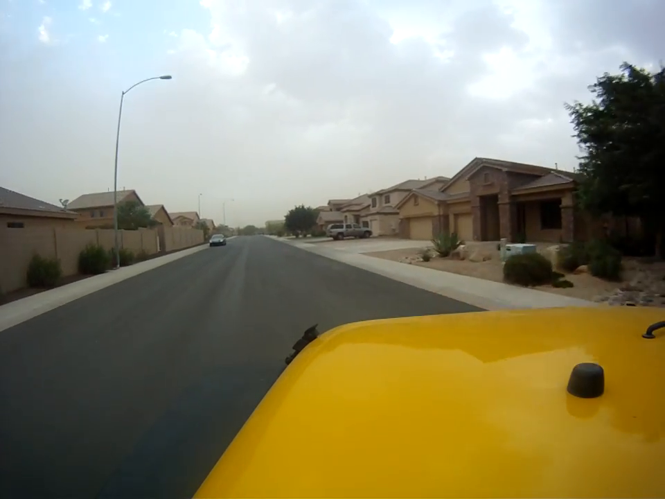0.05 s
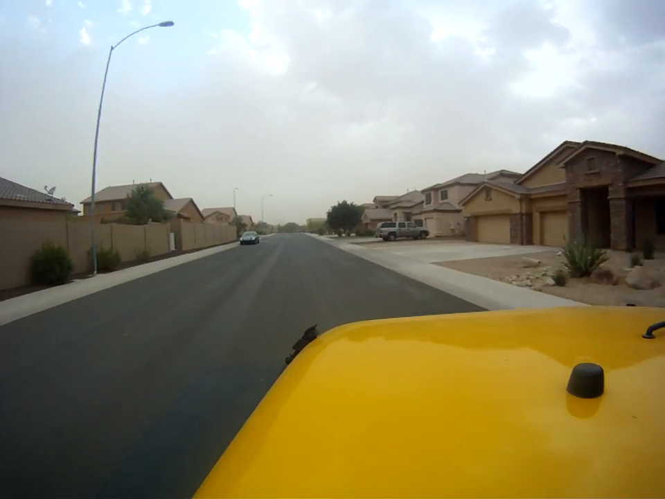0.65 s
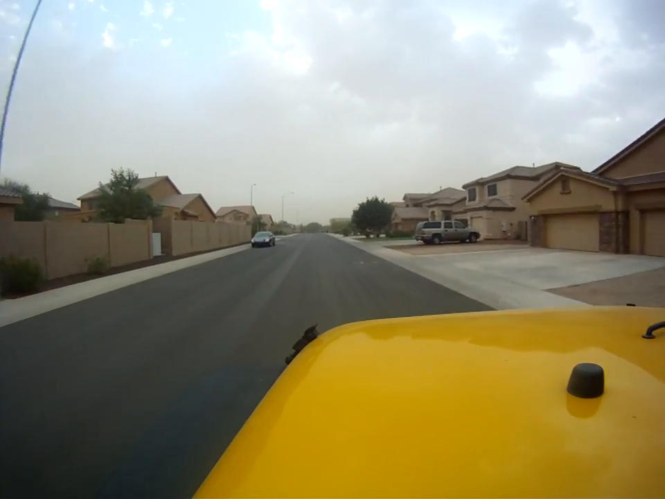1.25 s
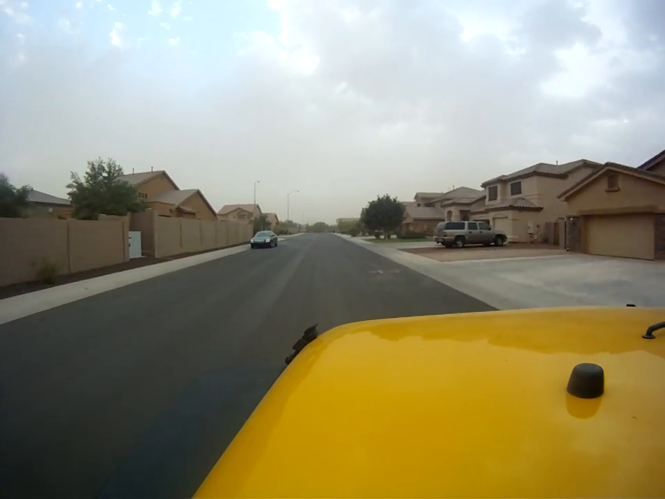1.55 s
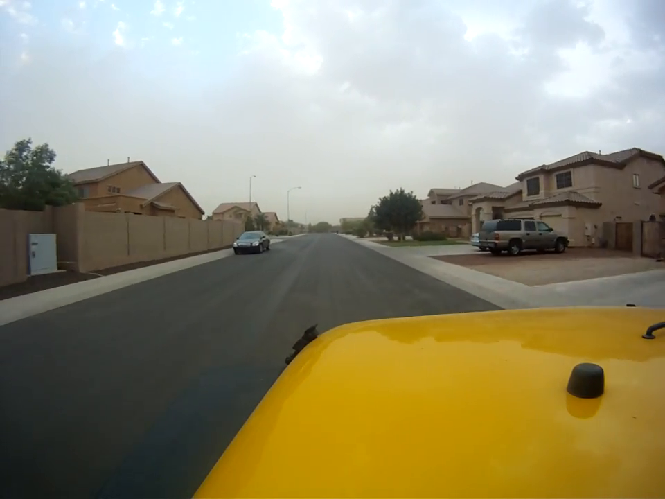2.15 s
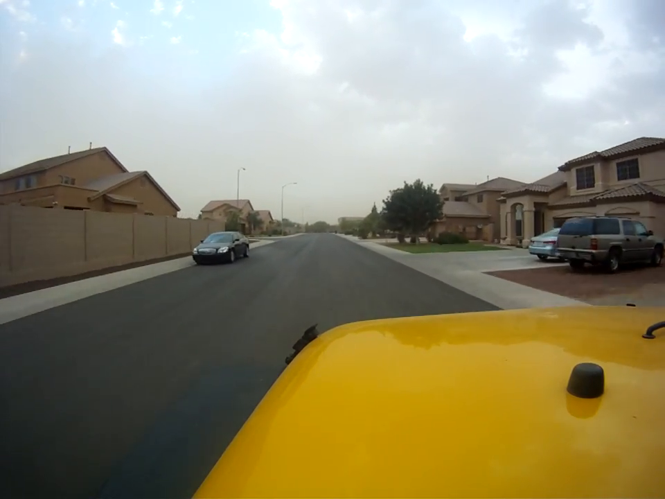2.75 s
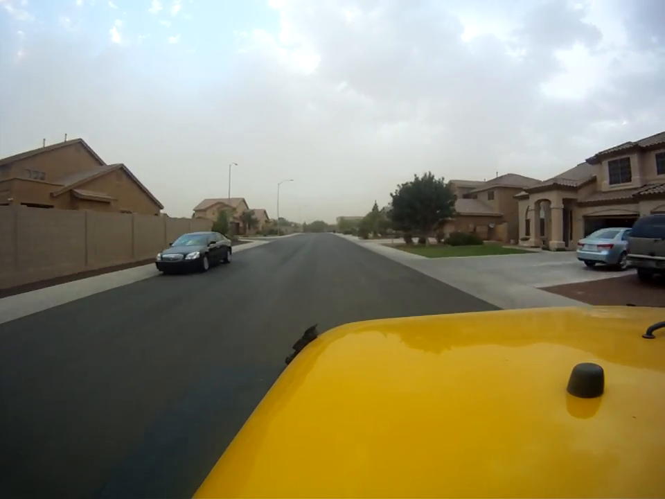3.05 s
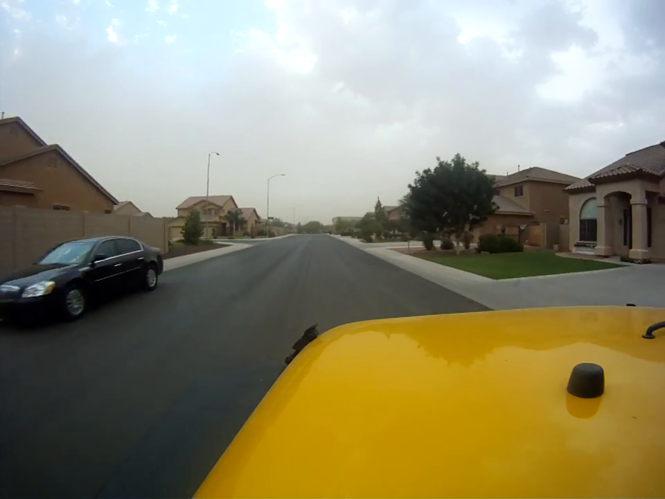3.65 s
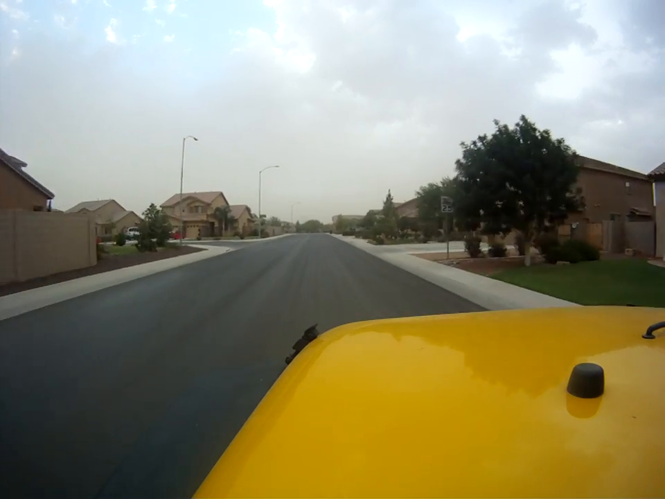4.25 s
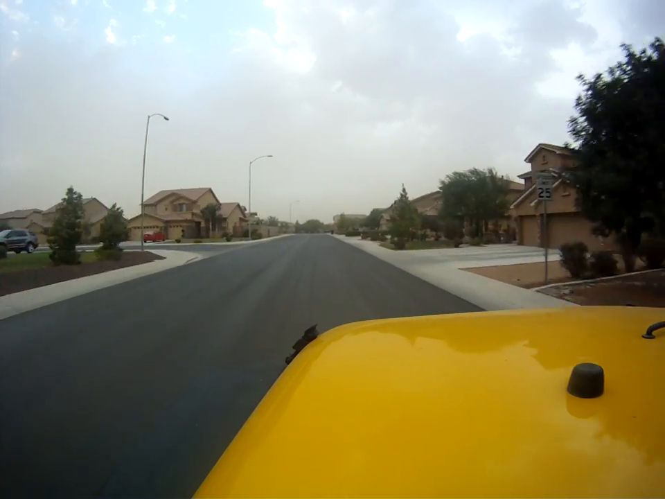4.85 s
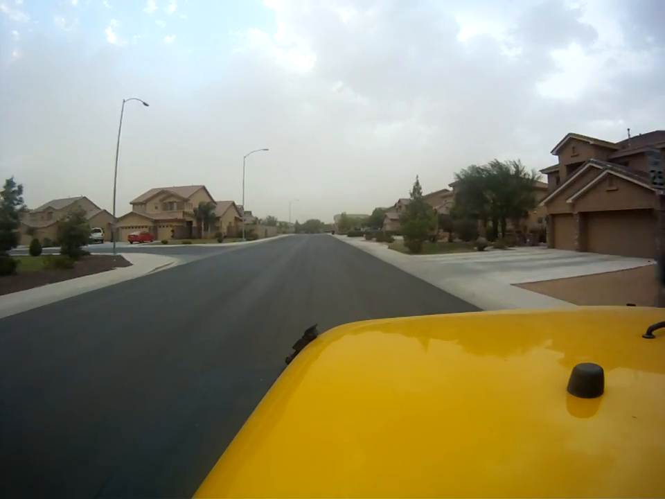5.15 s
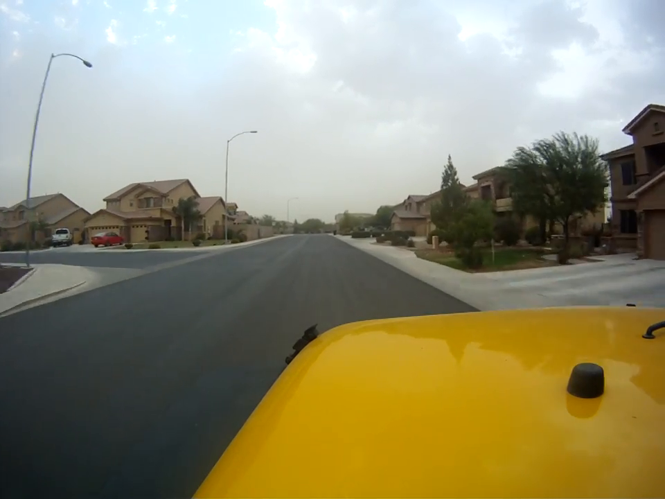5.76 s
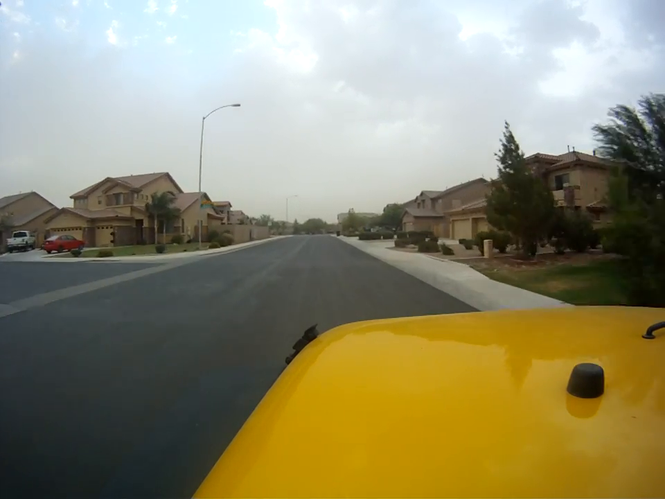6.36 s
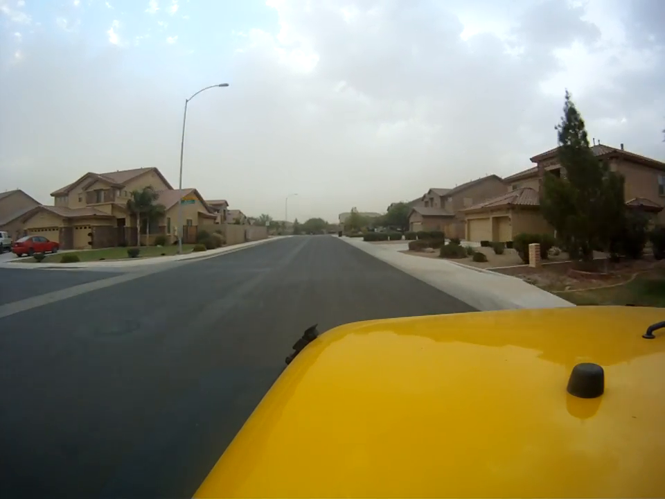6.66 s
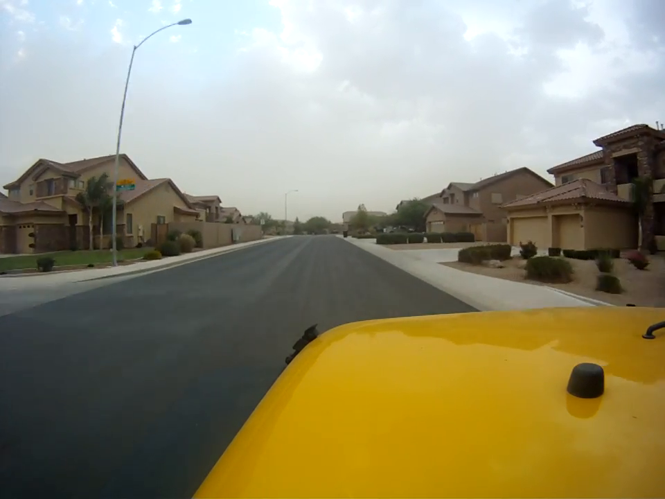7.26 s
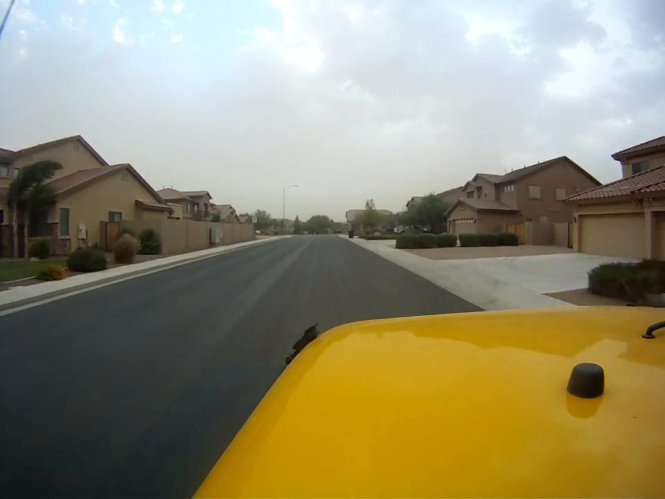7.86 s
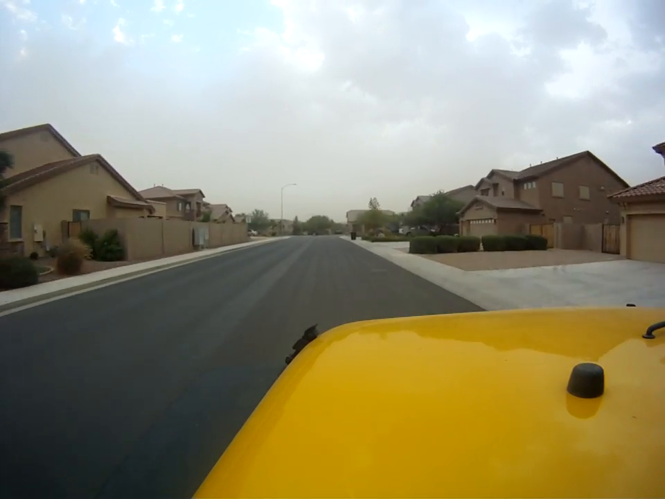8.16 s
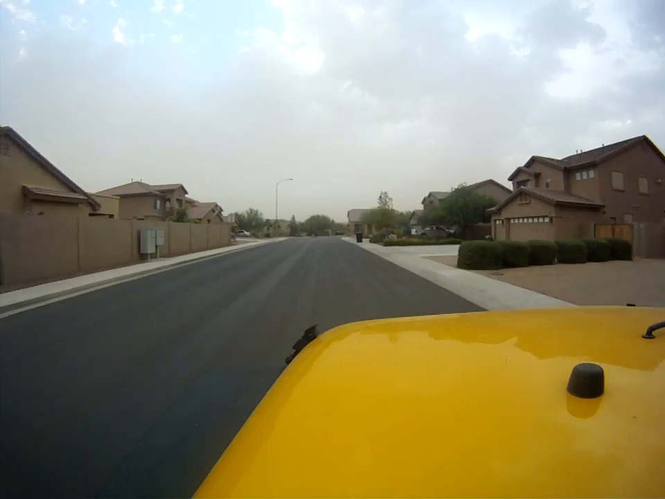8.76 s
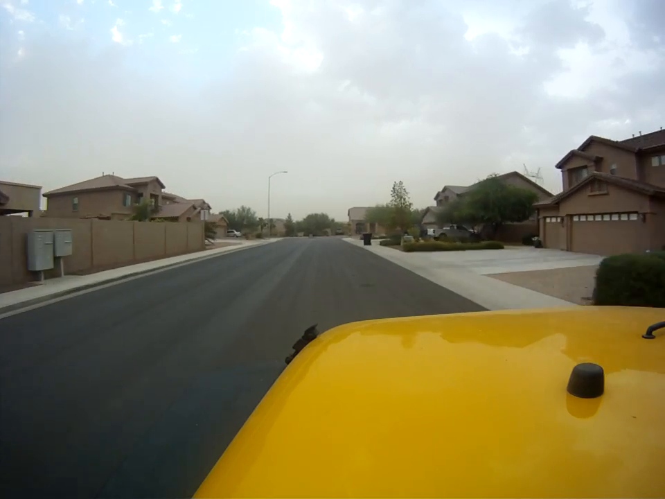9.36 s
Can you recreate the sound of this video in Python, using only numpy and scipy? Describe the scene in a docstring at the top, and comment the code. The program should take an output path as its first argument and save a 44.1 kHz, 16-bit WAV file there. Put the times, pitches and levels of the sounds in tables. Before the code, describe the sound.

Deep wind rumble and steady tyre roar surround a microphone on the hood of a moving car. The engine hums under load, eases off, then settles lower as a drone swells and its rushing noise fades. Brief hissing gusts, soft thumps and light ticks of grit dot the drive down a quiet street, all with a slightly gritty treble edge.

```python
"""A quiet street, heard from a cased camera on the hood of a moving off-road car.
The six-cylinder engine pulls, then drops in two steps to a cruising hum; its rush fades with load.
Tyres roar on the asphalt and their tread hums beat. Hood and case colour rush and roar.
Wind and jolts shake the hood into a deep rumble, gusts hiss over the case, grit ticks.
The camera's sample-and-hold adds a gritty treble sheen."""
import sys
import numpy as np
from scipy import signal
from scipy.fft import rfft, irfft
from scipy.io import wavfile
from scipy.ndimage import uniform_filter1d

SR = 44100
rng = np.random.default_rng(int(sys.argv[2]) if len(sys.argv) > 2 else 0)


def master_out(mix):
    """Clip the mix to full scale and print it as 16-bit PCM to the path in sys.argv[1]."""
    frames = np.transpose(np.atleast_2d(mix))
    ceiling = np.clip(frames, -1, 1)
    pcm = np.round(ceiling * 32767).astype(np.int16)
    wavfile.write(sys.argv[1], SR, pcm)


N = 424238
TIME_S, FREQS_HZ = np.arange(N) / SR, np.arange(N // 2 + 1) * SR / N

# four-stroke cycle rate: t/s, f/Hz
CYCLE_RATE = [(0, 16.4), (.8, 16.7), (1.4, 16.75), (1.8, 16.4), (2.3, 15.1), (4, 15.3), (4.7, 15.4),
              (5.2, 13.7), (5.5, 13.12), (8.1, 13.28), (9.62, 13.1)]
# cycle rate at cruising, easing, pulling: f/Hz
STATE_HZ = [13.2, 15.2, 16.6]
# firing note in those states: level/dB
FIRING_DB = [-57, -43.5, -40.5]
# engine overtones: multiple of cycle rate, level/dB at cruising, easing, pulling
OVERTONES = [(12, -62, -47.5, -51), (13, -50, -54, -76), (18, -62.5, -54, -59.5), (25, -55, -60, -57.5),
             (30, -51.5, -64, -63), (33.02, -61, -62, -53), (36.96, -57.5, -50, -81),
             (40.76, -75, -62, -48), (42, -55, -61, -51.5), (47.54, -54, -51, -97),
             (60.86, -61.5, -60, -57), (61.7, -74, -76, -50.5)]
# low drone near 200 Hz, engine and tyre hum swelling and dipping together: t/s, level/dB
DRONE_LEVEL = [(0, -55), (1.6, -55.5), (2.3, -50), (4.5, -47.5), (5.05, -54), (5.4, -41.5), (6.5, -41.5),
               (6.9, -57), (7.3, -42.5), (7.8, -40), (8.1, -43.5), (9.62, -45.5)]
# engine rush, following load: t/s, relative level/dB
RUSH_LEVEL = [(0, -40), (1.6, -40), (2, -41), (3.2, -42), (4.85, -42.6), (5.6, -46.5), (7, -48),
              (8.68, -48.5), (8.92, -57.5), (9.62, -59)]
# engine rush spectrum: f/Hz, relative level/dB
RUSH_SPECTRUM = [(60, -3.5), (130, -4.5), (250, -2), (500, -17), (1000, -6), (2000, -12), (3000, -23),
                 (4500, -37), (6000, -45)]
# wheel rotation: t/s, f/Hz
WHEEL_RATE = [(0, 5.2), (2, 5.5), (3, 5.72), (4.5, 5.98), (5.3, 6.11), (6.5, 6.18), (8, 6.22), (9.62, 6.14)]
# asphalt roar spectrum: f/Hz, relative level/dB
ROAR_SPECTRUM = [(58, 2.5), (75, -6), (120, -12.5), (200, -3), (300, -9.5), (550, -10.5), (800, -10.5),
                 (1200, -17), (2000, -30), (4000, -49), (6000, -53.5)]
# beat of left and right tyre: t/s, f/Hz
TYRE_BEAT = [(0, 1.82), (1.35, 1.82), (2, 1.3), (4.45, .29), (9.62, .3)]
# side tones of the uneven tread: multiple of wheel rate, level/dB at cruise
TREAD_TONES = [(27, -50), (28, -49), (32, -50.5), (53, -54.5), (66, -55.5), (80, -59), (90, -56.5)]
# low hood panel modes: f/Hz, half-width/Hz, relative level/dB
PANEL_MODES = [(26.1, 3.1, 2), (35.7, 4.2, .5), (45.2, 4.7, -3.5)]
# wind shaking the hood: t/s, level/dB
BUFFET_LEVEL = [(0, -29), (1.8, -29), (2.3, -26), (3.7, -28.5), (4.5, -24), (5.1, -27.5), (6.8, -27.5),
                (7.7, -31), (9.62, -29.8)]
# jolts to the hood: t/s, peak level/dB
JOLTS = [(.32, -26.5), (.87, -27), (1.45, -20.5), (2.48, -20.5), (2.98, -25.5), (3.2, -24.5), (3.47, -24),
         (3.94, -25), (4.72, -22), (4.88, -24), (5.62, -20), (5.78, -22), (6.25, -29), (7.22, -25)]
# gusts over the case: t/s, length/s, level/dB
GUSTS = [(0.116, 0.31, -48.5), (1.386, 0.1, -38.5), (1.566, .04, -48), (2.093, 0.081, -44),
         (3.147, .08, -53)]
# air hiss spectrum: f/Hz, relative level/dB
AIR_SPECTRUM = [(600, -13), (1300, -1), (2500, 2.5), (4000, -11), (6000, -17)]
# grit striking the body: t/s, peak level/dB
GRIT_HITS = [(2.16, -45), (2.4304, -42), (2.5516, -51), (2.589, -50), (2.6264, -49), (3.9424, -48),
             (4.5281, -51), (4.57, -52), (4.7192, -48), (4.7576, -49), (6.8758, -53), (7.1307, -51),
             (7.2085, -53), (8.1354, -54)]
# hood and engine bay peaks and dips: f/Hz, width/Hz, gain/dB
HOOD_RESONANCES = [(100, 36, 11), (129.9, 25.2, 12.5), (160.4, 21.6, 7), (244.4, 68, -9.5), (440, 22, 5),
                   (490, 15, 6.5), (522, 26, -9.5), (565, 78, 5.5), (723, 32, 2.5), (953, 62, -4.5),
                   (1064, 125, 9), (1173, 64, 8), (1273, 552, -11.5), (1586, 13, 6)]
# camera case peaks and dips: f/Hz, width/Hz, gain/dB
CASE_RESONANCES = [(2051, 190, 7), (2060, 55, 4), (2310, 182, 8.5), (2618, 82, 7), (2820, 260, -3),
                   (3741, 450, 19.5), (4087, 110, 8), (5140, 280, 4.5)]


def engine_hum_and_drone(cycle_hz, cycles, cylinders=6, drone_order=15):
    """Firing note and overtones vary as speed moves them across bay resonances; a low drone joins."""
    firing_db = np.interp(cycle_hz, STATE_HZ, FIRING_DB)
    firing, drone = tone(cylinders, cycles), tone(drone_order, cycles)
    hum = firing * from_db(firing_db + 2 * drift(14))
    # one tone stands for engine and tyre hum swelling and dipping together
    hum += drone * from_db(in_time(DRONE_LEVEL) + drift(4.4))
    for multiple, *state_db in OVERTONES:
        order = np.round(2 * multiple) / 2  # geared to the shaft
        level_db = np.interp(cycle_hz, STATE_HZ, state_db)
        hum += tone(order, cycles) * from_db(level_db + 1.4 * drift(11))
    return hum


def engine_rush(cycles, body_db, gain_db=6.0, clatter_share=0.19, clatter_low_hz=280, cylinders=6):
    """Fan, intake and valves: per-cycle clatter plus turbulence, throbbing at the firing rate."""
    pattern = rng.standard_normal(4096)
    looped = np.interp(cycles % 1, np.linspace(0, 1, len(pattern)), pattern)
    colour = spectrum_gain(RUSH_SPECTRUM, body_db) * (FREQS_HZ > clatter_low_hz)
    clatter = unit_rms(filtered(looped, colour))
    turbulence = noise(RUSH_SPECTRUM, body_db)
    rush = np.sqrt(clatter_share) * clatter + np.sqrt(1 - clatter_share) * turbulence
    throb = 1 + 0.036 * np.sin(2 * np.pi * cylinders * cycles)
    return rush * throb * from_db(in_time(RUSH_LEVEL) + gain_db + 0.82 * drift(33))


def tyres(body_db, cruise_hz=6.2, roar_db=-35.0, roar_db_per_hz=2.0, side_db_per_hz=7.0, blocks=24):
    """Asphalt roar and hum of tread blocks meeting the road; roar and side tones grow with speed."""
    wheel_hz = in_time(WHEEL_RATE)
    excess_hz = wheel_hz - cruise_hz
    roar = noise(ROAR_SPECTRUM, body_db)
    roar *= from_db(roar_db + roar_db_per_hz * excess_hz + 0.22 * drift(14))
    revs = turns(wheel_hz, wander=0.00908)
    hum = tone(blocks, revs) * tread_gain(blocks * wheel_hz) * from_db(1.1 * drift(10))
    for multiple, db in TREAD_TONES:
        hum += tone(multiple, revs) * from_db(db + side_db_per_hz * excess_hz + 2.8 * drift(4.4))
    return roar + hum


def tread_gain(tread_hz, near_tyre_db=-55.5, far_ratio_db=-2.5, in_phase_s=0.25):
    """Two tyres turn slightly apart, so their hums beat; both boom near a hood resonance."""
    beats = np.cumsum(in_time(TYRE_BEAT)) / SR
    beats -= np.interp(in_phase_s, TIME_S, beats)
    pair = np.abs(1 + from_db(far_ratio_db) * np.exp(2j * np.pi * beats))
    boom_db = bell_db(tread_hz, centre_hz=130.3, width_hz=28.7, peak_db=17.5)
    return pair * from_db(near_tyre_db + boom_db)


def hood_rumble(levelling=0.63):
    """Wind and jolts swing the hood panel in its lowest modes."""
    swing = np.zeros(N)
    for hz, half_width_hz, db in PANEL_MODES:
        response = 1 / (1 + ((FREQS_HZ - hz) / half_width_hz) ** 2)
        swing += from_db(db) * shaped_noise(response)
    power = uniform_filter1d(swing ** 2, size=SR // 7) + 1e-9
    levelled = unit_rms(swing / power ** (levelling / 2))  # slow swells shrink, fast beats stay
    wind_power = from_db(in_time(BUFFET_LEVEL)) ** 2
    jolt_power = sum((from_db(db) * swell(t, 0, rise_s=0.026, fall_s=0.091)) ** 2 for t, db in JOLTS)
    return levelled * np.sqrt(wind_power + jolt_power)


def case_hiss(breeze_db=-66, case_share=0.49):
    """Air brushes the outside of the case: a faint breeze and a few rough gusts."""
    flutter = from_db(1.2 * drift(70))
    gusts = sum(from_db(db) * swell(t, length_s, rise_s=0.016, fall_s=0.061) for t, length_s, db in GUSTS)
    hiss = noise(AIR_SPECTRUM, case_share * response_db(CASE_RESONANCES))
    return hiss * (from_db(breeze_db) + gusts) * flutter


def grit(decay_s=0.0041, faint_per_s=24.0, faint_db=-61.5):
    """Grit strikes the body: a few clear, dry ticks among many faint ones."""
    hits = (rng.random(N) < faint_per_s / SR) * from_db(faint_db + 2 * rng.standard_normal(N))
    for t, db in GRIT_HITS:
        hits[round(t * SR)] = from_db(db)
    envelope = signal.lfilter([1], [1, -np.exp(-1 / (decay_s * SR))], hits + 1e-18)
    return envelope * noise([(2000, 2), (6000, -6), (9000, -22)])


def turns(rate_hz, wander):
    """Running turn count of a shaft whose speed wanders slightly."""
    return np.cumsum(rate_hz * (1 + wander * drift(6))) / SR


def tone(order, revs):
    """Unit-RMS sine locked to a shaft, random phase."""
    return np.sqrt(2) * np.sin(2 * np.pi * (order * revs + rng.random()))


def swell(start_s, hold_s, rise_s, fall_s):
    """Exponential rise to 1 at start_s, hold, exponential fall."""
    before = np.maximum(start_s - TIME_S, 0) / rise_s
    after = np.maximum(TIME_S - start_s - hold_s, 0) / fall_s
    return np.exp(-np.minimum(before + after, 40))


def bell_db(hz, centre_hz, width_hz, peak_db):
    """One bell-shaped peak or dip."""
    return peak_db * 0.5 ** ((2 * (hz - centre_hz) / width_hz) ** 2)


def response_db(resonances):
    """Summed peaks and dips of a body."""
    return sum(bell_db(FREQS_HZ, *row) for row in resonances)


def spectrum_gain(spectrum, body_db):
    """Gain per bin: spectrum interpolated over log f, coloured by a body."""
    hz, db = np.transpose(spectrum)
    return from_db(np.interp(np.log(FREQS_HZ + 1), np.log(hz), db) + body_db)


def noise(spectrum, body_db=0):
    """Unit-RMS coloured noise, falling 12 dB/octave below the spectrum's first point."""
    low_cut = np.minimum(FREQS_HZ / spectrum[0][0], 1) ** 2
    return shaped_noise(spectrum_gain(spectrum, body_db) * low_cut)


def drift(corner_hz):
    """Smooth unit-RMS random wander."""
    return shaped_noise(1 / (1 + (FREQS_HZ / corner_hz) ** 2))


def shaped_noise(gain):
    return unit_rms(filtered(rng.standard_normal(N), gain))


def filtered(x, gain):
    return irfft(rfft(x) * gain, N)


def in_time(rows):
    return np.interp(TIME_S, *np.transpose(rows))


def unit_rms(x):
    return x / np.sqrt(np.mean(x ** 2) + 1e-20)


def from_db(db):
    return 10 ** (np.asarray(db) / 20)


def scene():
    """Mono mix: engine rush and tyre roar pass through hood and case; wind and grit act close by."""
    body_db = response_db(HOOD_RESONANCES) + response_db(CASE_RESONANCES)
    cycle_hz = in_time(CYCLE_RATE)
    cycles = turns(cycle_hz, wander=0.002)
    drive = engine_hum_and_drone(cycle_hz, cycles) + engine_rush(cycles, body_db) + tyres(body_db)
    return (drive + hood_rumble() + case_hiss() + grit())[None]


def record(dry, edge_hz=5680.0, order=24, hold_hz=12000, cutoff_hz=15250, fade_s=0.004):
    """The camera samples slowly and holds each sample, mirroring the band into a treble sheen."""
    fades = np.minimum(1, np.minimum(TIME_S, TIME_S[::-1]) / fade_s)
    band = filtered(dry * fades, 1 / np.sqrt(1 + (FREQS_HZ / edge_hz) ** (2 * order)))
    mirrored = band * (1 + 2 * np.cos(2 * np.pi * hold_hz * TIME_S))
    held = filtered(mirrored, np.sinc(FREQS_HZ / hold_hz))
    lowpass = signal.ellip(12, 0.1, 80, cutoff_hz, fs=SR, output="sos")
    return signal.sosfilt(lowpass, held)


dry = scene()
out = record(dry)
master_out(out)
```